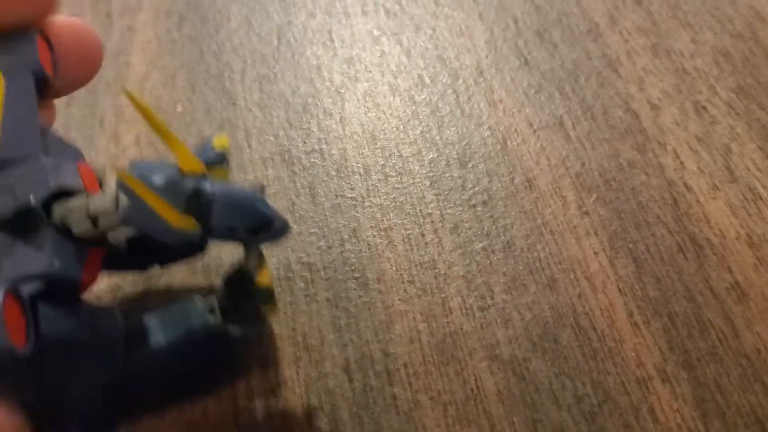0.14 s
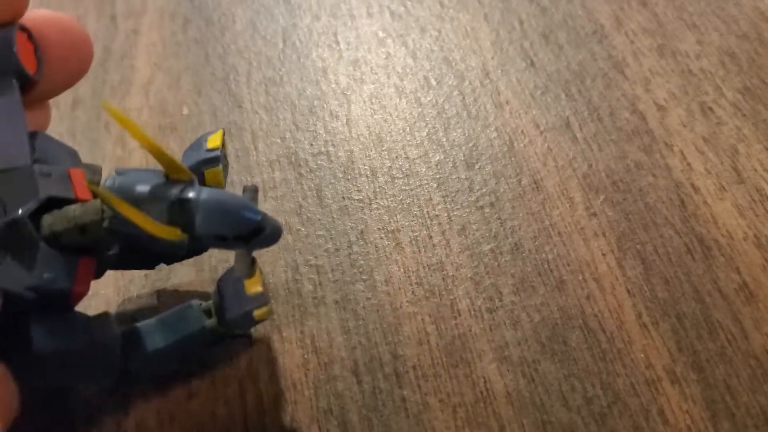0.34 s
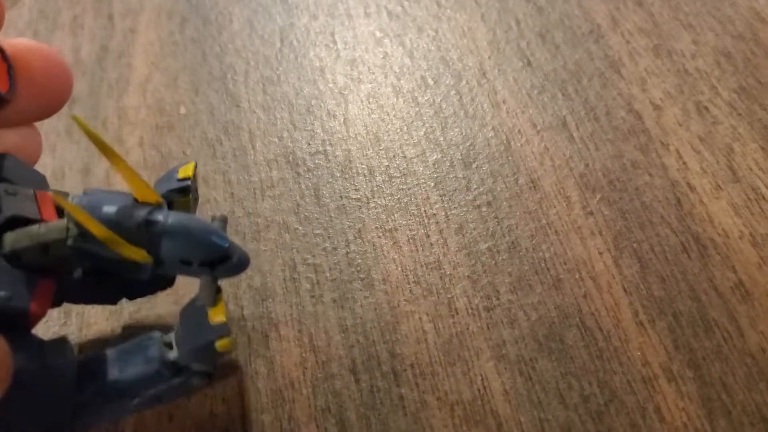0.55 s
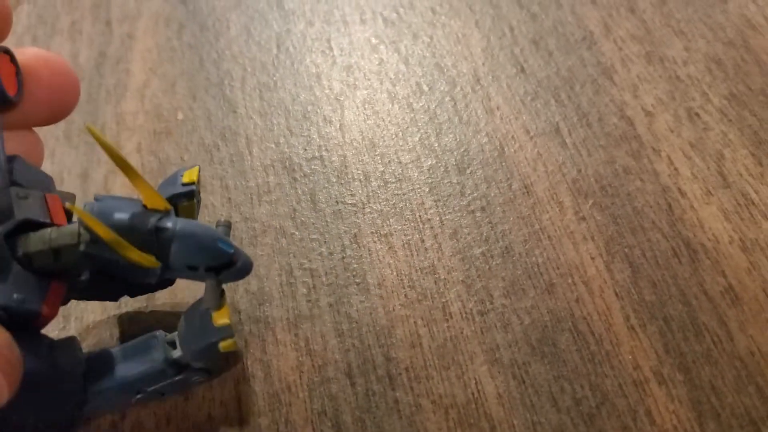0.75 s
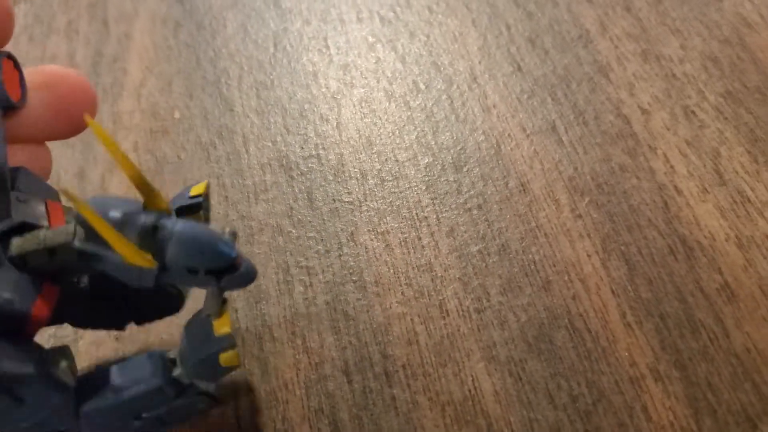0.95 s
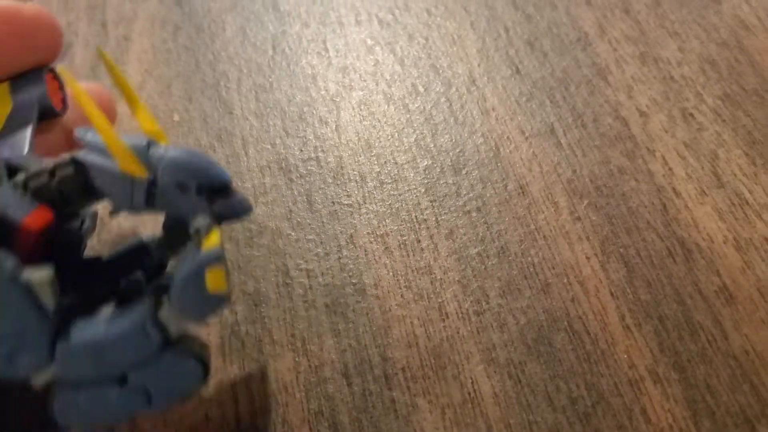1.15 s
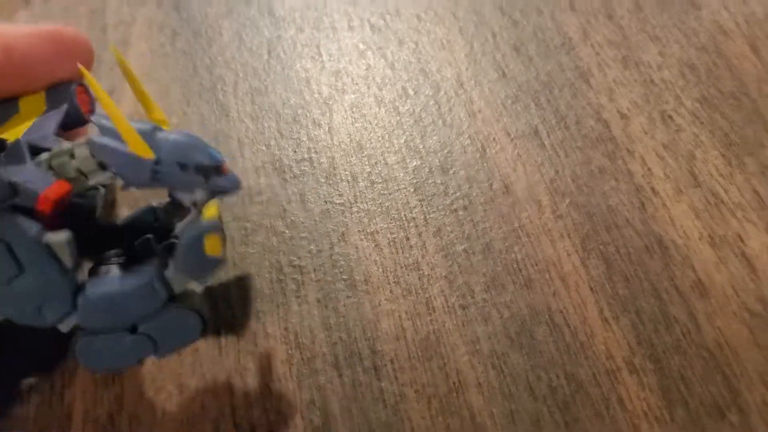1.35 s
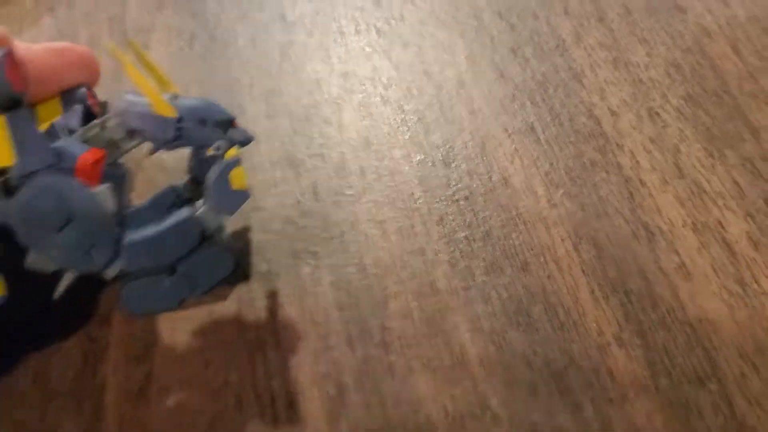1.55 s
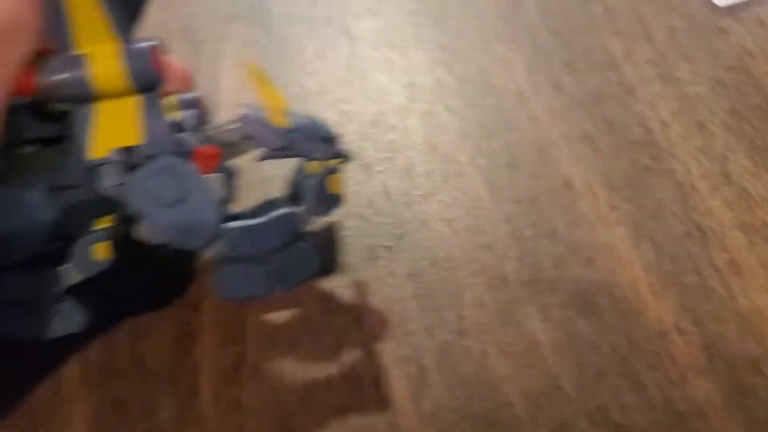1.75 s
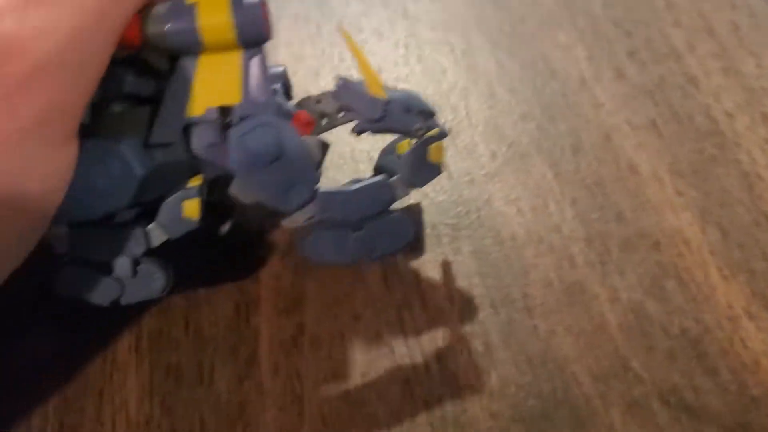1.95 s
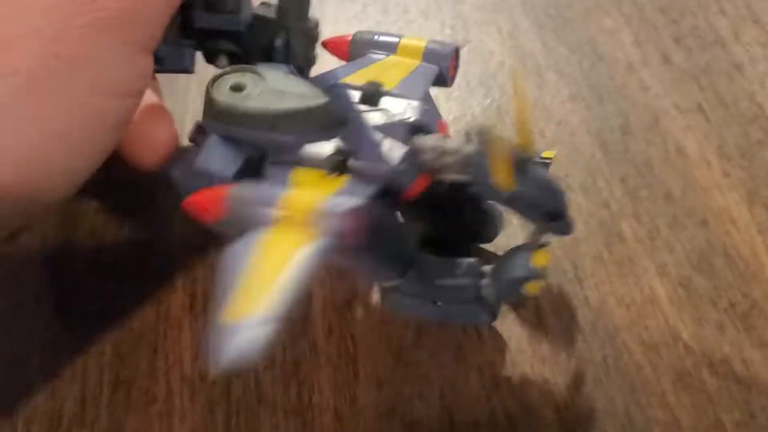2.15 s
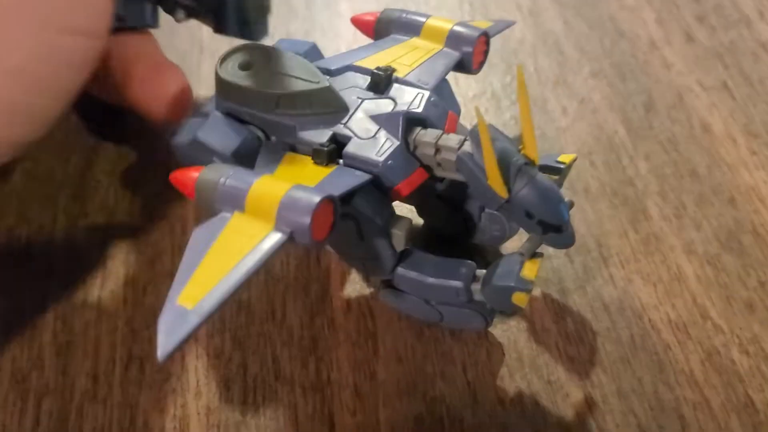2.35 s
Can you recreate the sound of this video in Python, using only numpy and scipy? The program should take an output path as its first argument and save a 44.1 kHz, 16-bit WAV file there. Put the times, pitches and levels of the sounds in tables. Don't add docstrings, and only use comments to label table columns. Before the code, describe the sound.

Close stereo phone pickup of a plastic toy figure: a wing snaps in with sharp clicks, a tight joint creaks faintly and ratchets, then the toy rattles, scrapes and drags on a wooden table.

```python
import sys
import numpy as np
from scipy import signal
from scipy.io import wavfile
from scipy.ndimage import uniform_filter1d

SR = 44100
rng = np.random.default_rng(int(sys.argv[2]) if len(sys.argv) > 2 else 0)


def voltage_ratio(decibels):
    exponent = np.asarray(decibels, float) / 20
    return 10 ** exponent


def inscribe(sig):
    pcm = np.round(np.clip(np.atleast_2d(sig).T, -1, 1) * 32767)
    wavfile.write(sys.argv[1], SR, pcm.astype(np.int16))


N = 110250


def rms_one(x):
    return x / np.sqrt(np.mean(x ** 2) + 1e-20)


def in_time(rows):
    s, *columns = np.transpose(rows)
    return [np.interp(np.arange(N) / SR, s, c) for c in columns]


def drift(rate_hz):
    r = np.exp(-80 * np.pi * rate_hz / SR)
    noise = rng.standard_normal(N // 40 + 2002)
    slow = signal.lfilter([1], [1, -2 * r, r * r], noise)[2000:]
    return np.interp(np.arange(N) / 40, np.arange(len(slow)), rms_one(slow))


def ring(x, hz, t60_s):
    r, w = voltage_ratio(-60 / (t60_s * SR)), 2 * np.pi * hz / SR
    return signal.lfilter([0, np.sin(w)], [1, -2 * r * np.cos(w), r * r], x + 1e-18)


def port_db(hz):
    # pitch_hz, left_db, right_db (per Hz)
    port_colour = [(447, -1, -12.5), (1030, -17, -12), (2160, -4, 3.5), (3640, -1.5, 4.5), (6800, 0, -1),
                   (8100, -4.5, -8.5), (11820, 1, -11), (15500, 7, -3.5)]
    at_hz, *ports = np.transpose(port_colour)
    return np.array([np.interp(np.log(hz), np.log(at_hz), p) for p in ports])


def squeak():
    # start_s, pitch_hz, level_db
    glide = [
        (.31, 2650, -100),
        (.35, 2800, -85),
        (.44, 2920, -81),
        (.57, 2820, -80),
        (.63, 2700, -96),
    ]
    harmonics_db = [-8, 0, -3, 2, -6]
    hz, db = in_time(glide)
    turns = np.cumsum(hz * (1 + .003 * drift(60))) / SR
    tone = sum(voltage_ratio(d) * np.sin(2 * np.pi * k * turns) for k, d in enumerate(harmonics_db, start=1))
    return voltage_ratio(db + 3.0 * drift(15)) * tone * voltage_ratio(np.c_[[3.0, -9.0]])


def scrape():
    # centre_s, half_length_s, pitch_hz, t60_s, level_db
    ridge = (2.036, .013, 5450, .005, -36)
    s, half, hz, t60_s, db = ridge
    noise = rms_one(ring(rng.standard_normal((2, N)), hz, t60_s))
    swell = np.exp(-((np.arange(N) / SR - s) / half) ** 4)
    return voltage_ratio(db + np.c_[[-4.0, 3.0]]) * noise * swell


def sliding(slide_db):
    # centre_s, half_length_s, level_db
    scuffs = [(0.136, 0.018, -53), (0.238, 0.012, -35.5), (0.284, 0.041, -57.5), (0.47, 0.031, -56.5),
              (0.82, 0.007, -53.5), (1.308, 0.091, -50.5), (1.79, 0.017, -46), (2.02, 0.012, -41),
              (2.067, 0.022, -38.5), (2.125, 0.012, -38.5), (2.346, 0.023, -70.5)]
    patchy_db, grain_db = 4, 1.5
    t, level = np.arange(N) / SR, voltage_ratio(slide_db)
    for s, half, db in scuffs:
        level = level + voltage_ratio(db) * np.exp(-((t - s) / half) ** 2)
    out, together = 0, drift(20)
    edges_hz = 450 * 2 ** np.arange(0, 5.4, 1 / 3)
    white = rng.standard_normal((2, 2, N)) * voltage_ratio(grain_db * drift(150))
    for k, (low, high) in enumerate(zip(edges_hz, edges_hz[1:])):
        db = np.c_[port_db(np.sqrt(low * high))]
        band_filter = signal.butter(2, [low, high], "band", fs=SR, output="sos")
        band = signal.sosfilt(band_filter, white[k % 2])
        out = out + voltage_ratio(db + patchy_db * (0.2 * together + drift(2.5))) * band
    top = signal.cheby2(16, 50, 16200, fs=SR, output="sos")
    return level * rms_one(signal.sosfilt(top, out))


def table_top(drag_db):
    # start_s, level_db, middle_modes_db, upper_modes_db (hardness)
    knocks = [(.036, -59, 9, 25.5), (.11, -63.5, 6, 22.5), (.228, -42.5, 1, 9.5), (.272, -42.5, -5, 5),
              (.298, -49.5, -0.5, -18), (.472, -58.5, -1, -26), (.63, -45, -8, 7), (.738, -55, -3.5, 7.5),
              (1.051, -52.5, -6.5, -22), (1.231, -44.5, 4, -0.5), (1.2859, -32.5, -5.5, 21),
              (1.372, -48.5, 0, 16), (1.44, -54, -19, 10), (1.61, -49, -22, 4), (1.649, -59.5, -11, -31),
              (1.805, -47, 2, 9.5), (1.836, -52, 13, 15.5), (1.885, -60.5, 5, 18), (2.012, -48, 3, 19),
              (2.042, -47, 5, 15), (2.081, -47, 9, 15), (2.184, -35.5, 3.5, 19.5), (2.341, -51, 0, 11)]
    # pitch_hz, level_db, t60_s
    modes = [(54, -17.5, 1), (68, -6.5, 0.46), (92.9, -3, 0.076), (175.8, -9.5, .2), (244, -10.5, 0.032),
             (291, -11, 0.17), (378, -10.5, 0.078), (463.4, -17.5, 0.082), (789, -17, 0.022),
             (862.5, -14.5, 0.033), (927, -16, .04), (1650, -13, 0.0019), (2124, -17.5, 0.0074)]
    middle_from_hz, upper_from_hz = 220, 550
    drag_lumpy_db, shudder_db, shudder_t60_s = 3, -7.5, 0.43
    s, db, middle_db, hard_db = np.transpose(knocks)
    out, lumps = np.zeros((2, N)), voltage_ratio(drag_db + drag_lumpy_db * drift(3.15))
    for hz, level_db, t60_s in modes:
        luck = rng.standard_normal((len(s), 2))
        knock_db = db + 0.44 * luck[:, 0]
        knock_db = knock_db + (middle_from_hz < hz < upper_from_hz) * middle_db
        knock_db = knock_db + (hz > upper_from_hz) * hard_db
        clicks = np.zeros(N)
        clicks[(s * SR).astype(int)] = voltage_ratio(knock_db) * np.sign(luck[:, 1])
        fade_s = shudder_t60_s * (70 / hz) ** 0.45
        shudder = signal.lfilter([1], [1, -voltage_ratio(-60 / SR / fade_s)], np.abs(clicks) + 1e-18)
        rub = lumps * voltage_ratio(-8.5) + voltage_ratio(shudder_db) * shudder
        mid, side = rng.standard_normal((2, N)) * rub / np.sqrt(t60_s * SR / 14)
        middle = ring(clicks + mid, hz, t60_s)
        spread = 0.44 * ring(side + clicks * 0.21, hz, t60_s) * [[1], [-1]]
        out += voltage_ratio(level_db) * (middle + spread)
    return out


def ticks():
    # start_s, thin_edges_db, upper_shell_db, lower_shell_db, hollow_body_db
    press_ticks = [(.0099, -68, -40, -60, -45), (.017, -34.5, -34.5, -47, -46),
                   (.021, -39, -41, -43.5, -39), (0.1884, -46.5, -45, -45, -50),
                   (0.2185, -11.5, -31, -34.5, -48), (0.2265, -33, -40, -36, -50),
                   (0.2351, -30.5, -21.5, -35, -36.5), (0.2389, -14, -24.5, -23.5, -39.5),
                   (0.2452, -31, -41, -33.5, -43), (.299, -53, -70, -49.5, -51),
                   (0.4392, -68, -51, -46, -58.5), (0.4718, -37.5, -49, -44.5, -73),
                   (0.541, -64, -58, -53, -74)]
    creak_ticks = [(.63, -54, -55, -51, -56), (0.6562, -48, -55, -52, -68), (0.6862, -42.5, -54, -53, -61),
                   (0.6899, -34.5, -49, -47.5, -59), (.71, -52, -50, -56, -56),
                   (0.7296, -47, -52, -70, -80), (0.737, -43, -31, -29, -44), (0.7663, -52, -59, -55, -69),
                   (0.7783, -50, -55, -62, -64), (0.7898, -50, -54, -54, -70), (0.8095, -47, -58, -59, -74),
                   (0.8176, -52, -41, -45.5, -50.5), (.834, -53, -63, -62, -68), (.845, -70, -65, -64, -67),
                   (.867, -51, -49, -52, -62), (0.889, -71, -62, -60, -73), (.9155, -44.5, -48.5, -53, -66),
                   (0.9262, -61, -62, -69, -73)]
    ratchet_ticks = [(0.9494, -12.5, -19.5, -17.5, -38), (0.9565, -54, -52, -47, -55),
                     (.976, -47, -46, -35, -37.5), (0.9795, -38, -52, -50, -62),
                     (0.9975, -21.5, -22.5, -29, -44.5), (1.0078, -20.5, -28.5, -20.5, -37.5),
                     (1.0263, -49, -41, -31, -39.5), (1.0453, -44, -48, -50, -63),
                     (1.048, -26, -44, -37, -45), (1.0528, -27.5, -28.5, -26, -38),
                     (1.091, -56, -48, -48, -64), (1.14, -31, -33, -41.5, -48),
                     (1.1801, -23, -26, -38, -44), (1.192, -28, -42, -44, -60),
                     (1.2119, -31, -42.5, -50, -53), (1.2774, -56, -49, -54, -63),
                     (1.2877, -14.5, -17, -19.5, -17.5), (1.3017, -17.5, -28, -28, -39.5),
                     (1.3641, -37, -40.5, -38.5, -43), (1.397, -60, -43, -39.5, -39),
                     (1.425, -66, -66, -50, -48), (1.5055, -51, -54, -52, -56),
                     (1.5616, -33.5, -31, -44, -51), (1.5994, -32.5, -33.5, -41, -42.5),
                     (1.6494, -39, -54, -66, -63)]
    turn_ticks = [(1.7558, -43, -48, -47, -66), (1.7906, -32, -35.5, -33.5, -41),
                  (1.816, -60, -45, -46, -55), (1.863, -60, -61, -49, -54),
                  (1.8747, -24, -34, -31.5, -35.5), (1.8867, -41, -41.5, -35.5, -40.5),
                  (1.9605, -44.5, -48.5, -47.5, -50.5), (2.0062, -34.5, -38, -31, -33),
                  (2.0103, -20.5, -16, -28, -21), (2.0155, -18.5, -16, -15.5, -12.5),
                  (2.044, -40.5, -40, -43, -27), (2.0569, -7.5, -17.5, -23, -28),
                  (2.062, -33.5, -30, -38, -36.5), (2.0727, -42, -39, -41, -25),
                  (2.087, -42, -35, -34, -35), (2.1291, -38, -24, -23, -26), (2.1693, -38, -31, -31, -29),
                  (2.1869, -14, -21.5, -33, -17), (2.198, -38.5, -35, -36, -40),
                  (2.2536, -58.5, -54, -49, -36.5)]
    # lowest_mode_hz, highest_mode_hz, t60_s, left_db, right_db
    parts = [
        (7600, 16400, .0035, 5, -7),
        (4700, 7400, .005, -2, 2),
        (3000, 4600, .005, -2, 2),
        (1250, 3000, .009, -4, 3),
    ]
    # pitch_hz, width_hz, level_db
    crowds = [(1598, 200, -2.5), (2503, 234, 3.5), (3722, 310, -6.5), (5400, 610, 1), (6530, 530, 2),
              (8060, 360, -3.5), (9420, 230, -10.5), (10870, 560, -4), (12300, 440, 8), (14360, 490, 2.5),
              (15020, 570, -5.5)]
    # start_s, right_port_lag_s, left_minus_right_db
    place = [
        (.2, 0.00091, 1),
        (0.699, 0.00038, -0.5),
        (1.3, 0.00031, -1.0),
        (1.7, .0002, -1),
        (2.2, 0.00016, -2.5),
    ]
    between_crowds_db, uneven_db, rise_s = -7, 3.0, .0004
    tail_db, tail_t60_s = -36, 0.06
    out, t = np.zeros((2, N + SR)), np.arange(-100, 800) / SR
    late, fade = np.maximum(t, 0), np.hanning(1800)[900:]
    rise = 1 / (1 + np.exp(-t / rise_s)) ** 2
    at, lag, pan_db = np.transpose(place)
    centre, width, crowd_db = np.transpose(crowds)
    for s, *levels in press_ticks + creak_ticks + ratchet_ticks + turn_ticks:
        lag_s, left_db = np.interp(s, at, lag), np.interp(s, at, pan_db)
        for db, (low, high, t60_s, *gain_db) in zip(levels, parts):
            size, phase, turn = rng.standard_normal((3, 14, 1))
            hz = low + (high - low) * (np.arange(14) + rng.random(14))[:, None] / 14
            bumps = voltage_ratio(crowd_db) * np.exp(-((hz - centre) / width) ** 2)
            colour = voltage_ratio(between_crowds_db) + np.sum(bumps, axis=1, keepdims=True)
            flutter = rms_one(uniform_filter1d(rng.standard_normal((2, len(t))), size=30))
            tail = flutter * voltage_ratio(tail_db - 60 * late / tail_t60_s)
            shape = fade * rise * (voltage_ratio(-60 * late / t60_s) + tail)
            shade_db = (high > 1e4) * np.diff(port_db(hz), axis=0)[0]
            for ch in (0, 1):
                sines = np.sin(2 * np.pi * hz * t + 1.3 * phase + ch * turn)
                tones = colour * voltage_ratio(uneven_db * size + ch * shade_db) * sines
                wave = shape[ch] * tones.sum(axis=0)
                wave /= np.sqrt(uniform_filter1d(wave ** 2, size=22).max() * 2)
                i = int((s + t[0] - rise_s + (ch - .5) * lag_s) * SR)
                out[ch, i:i + len(t)] += voltage_ratio(db + gain_db[ch] + (1.0 - ch) * left_db) * wave
    return out[:, :N]


def scene():
    # start_s, fingers_on_shell_db, figure_dragging_on_table_db
    handling = [(0, -59, -47.5), (.17, -67, -50.5), (.33, -73, -63), (.6, -66, -64), (.75, -73.5, -58.5),
                (.9, -69.5, -64), (1.08, -54.5, -68.5), (1.2, -70.5, -54.5), (1.45, -65.5, -46.5),
                (1.6, -50.5, -46), (1.78, -56, -51.5), (1.84, -61, -53.5), (1.91, -54.5, -47.5),
                (1.98, -57.5, -49.5), (2.11, -59, -58.5), (2.2, -50.5, -33), (2.38, -73, -56.5),
                (2.5, -68, -68)]
    slide_db, drag_db = in_time(handling)
    return squeak() + scrape() + sliding(slide_db) + table_top(drag_db) + ticks()


def low_pass(x):
    return signal.sosfilt(signal.butter(12, 17660, fs=SR, output="sos"), x)


def record(dry):
    x = signal.sosfilt(signal.butter(4, 45, "high", fs=SR, output="sos"), dry)
    x = signal.sosfilt(signal.cheby2(12, 60, 17800, fs=SR, output="sos"), x)
    return low_pass(x)


dry = scene()
out = record(dry)
inscribe(out)
```